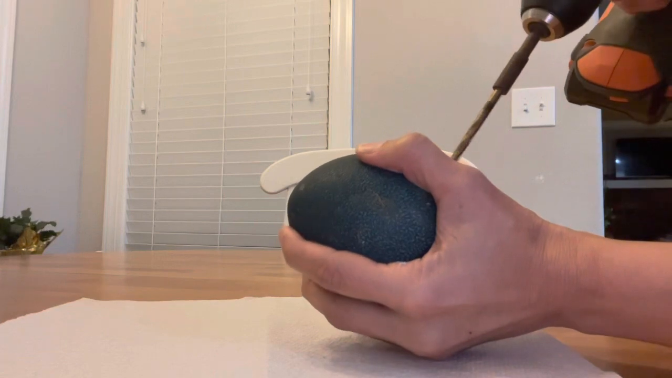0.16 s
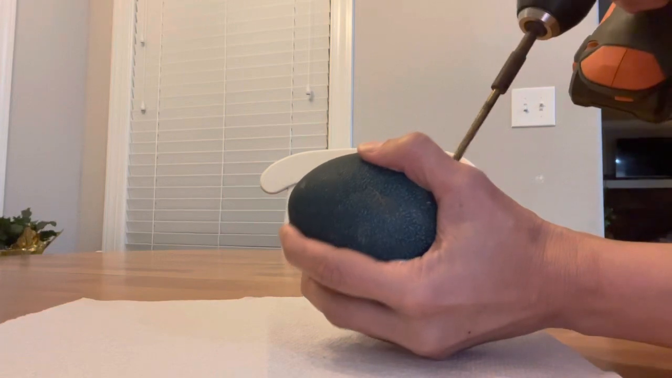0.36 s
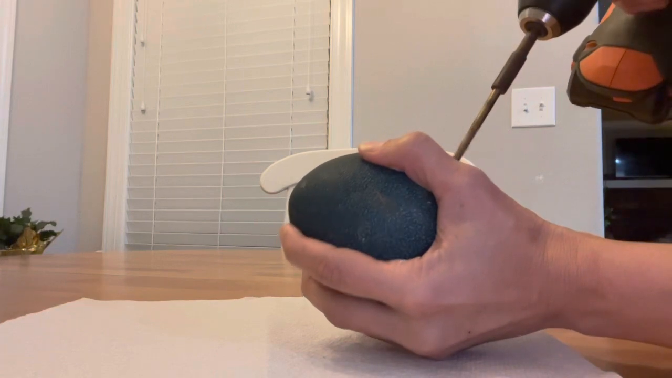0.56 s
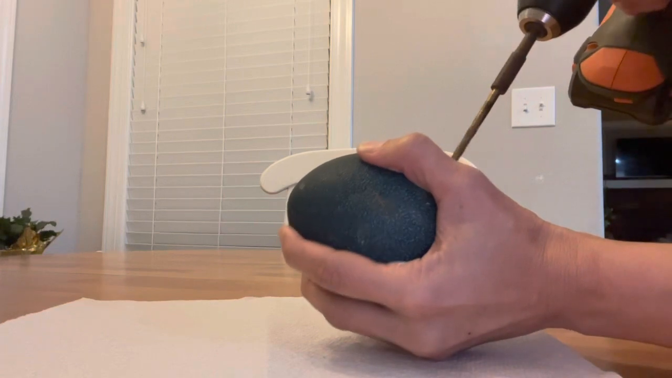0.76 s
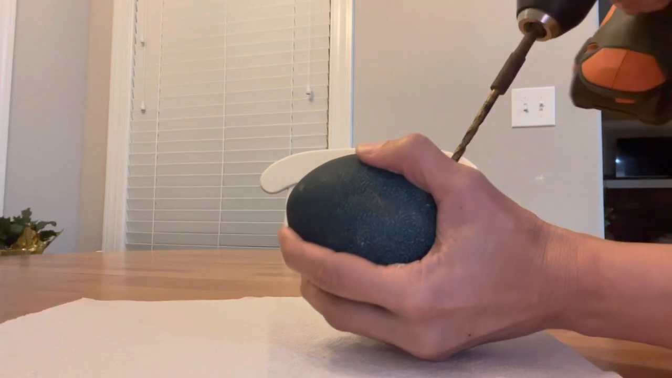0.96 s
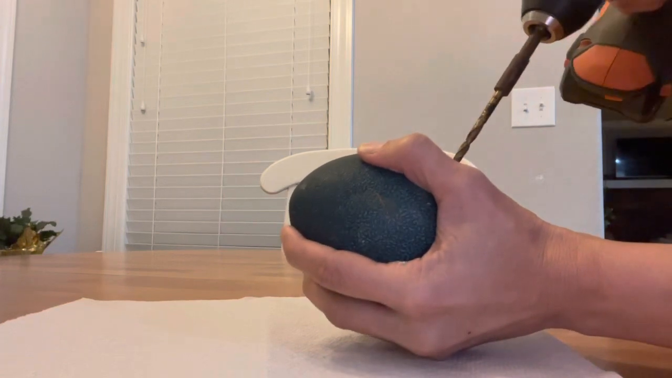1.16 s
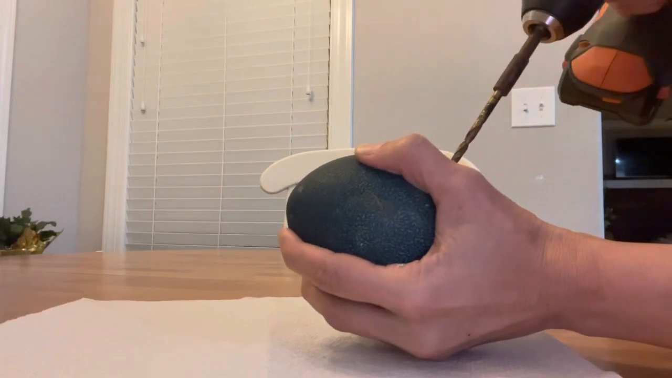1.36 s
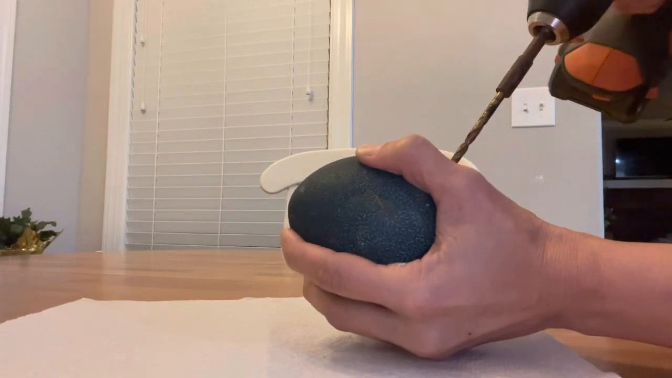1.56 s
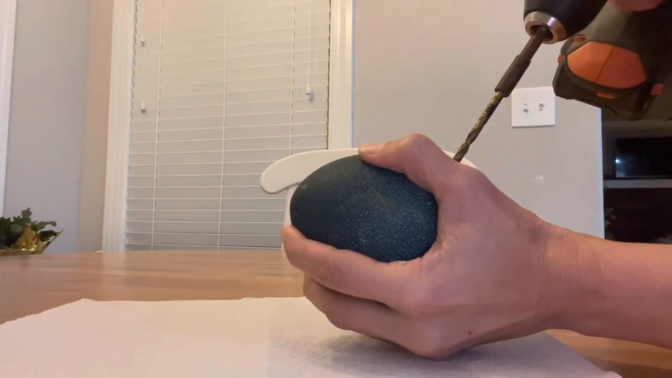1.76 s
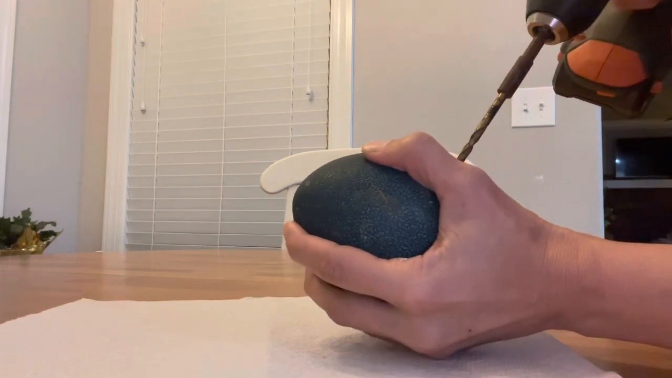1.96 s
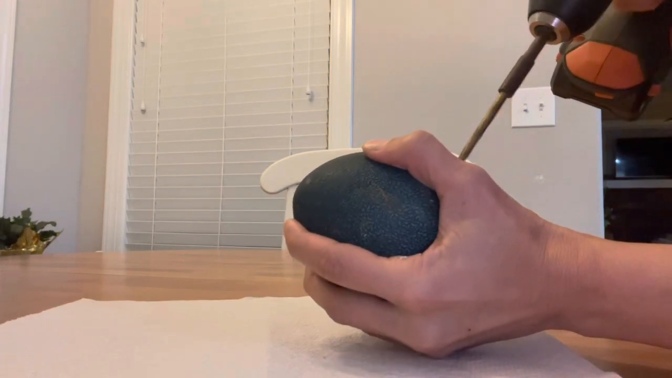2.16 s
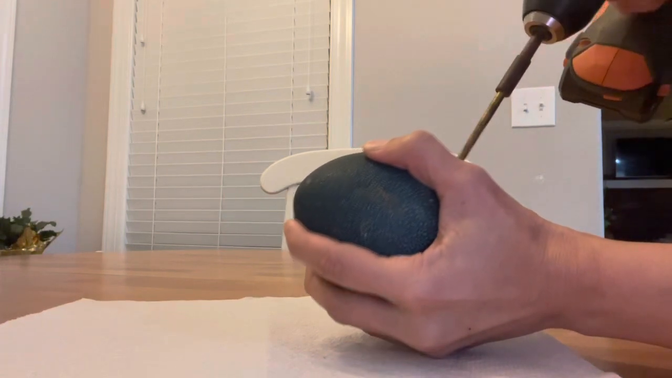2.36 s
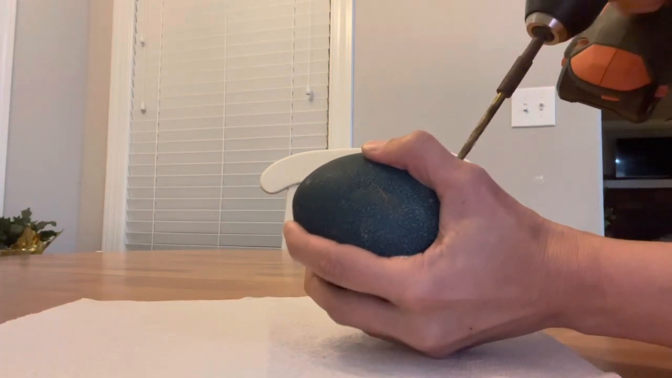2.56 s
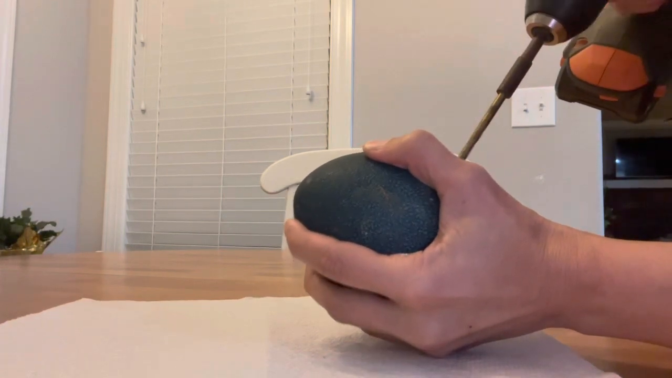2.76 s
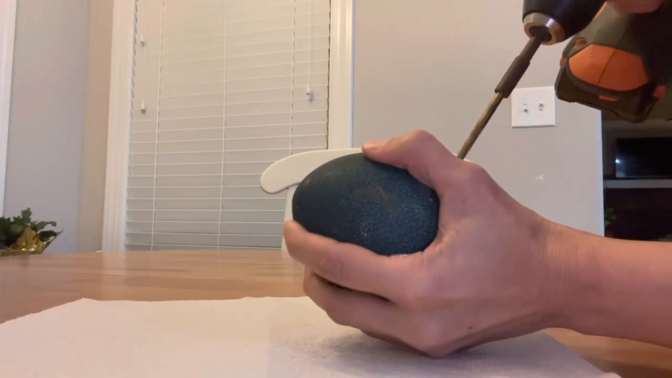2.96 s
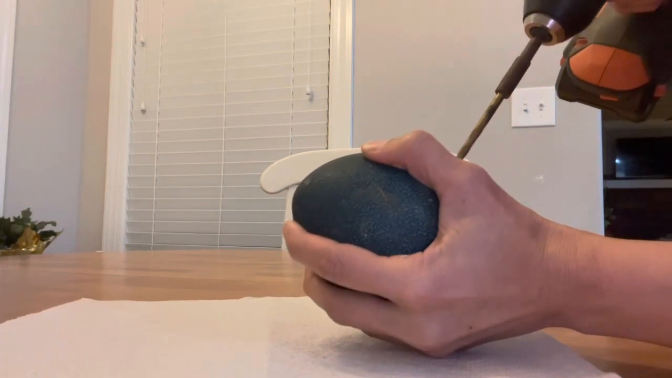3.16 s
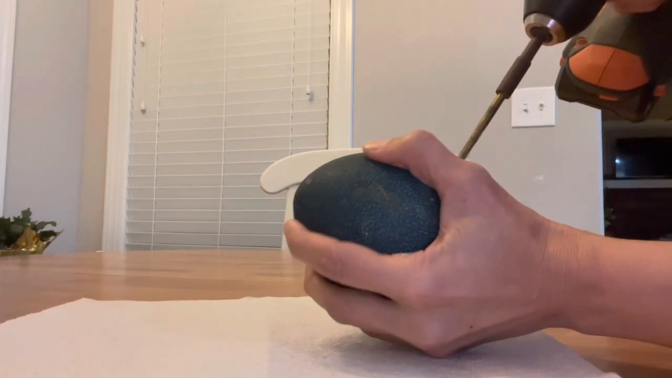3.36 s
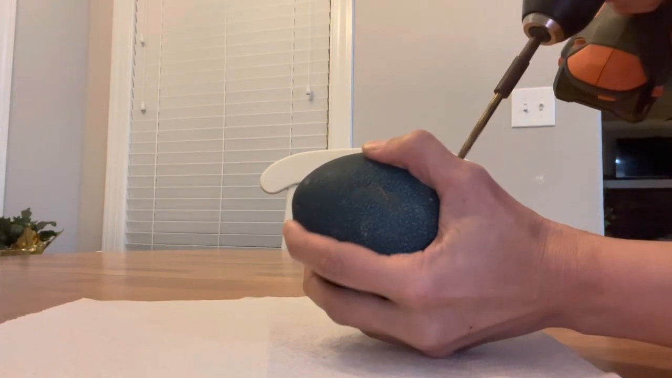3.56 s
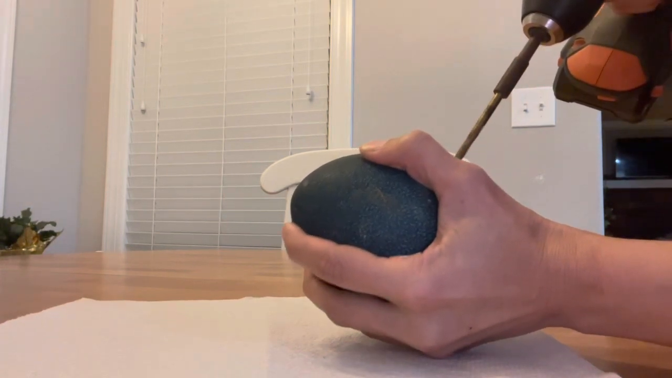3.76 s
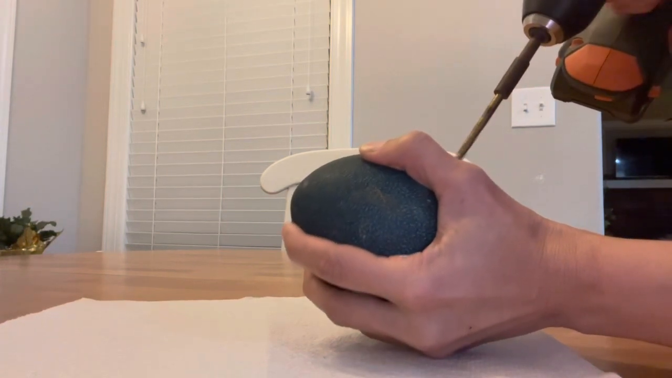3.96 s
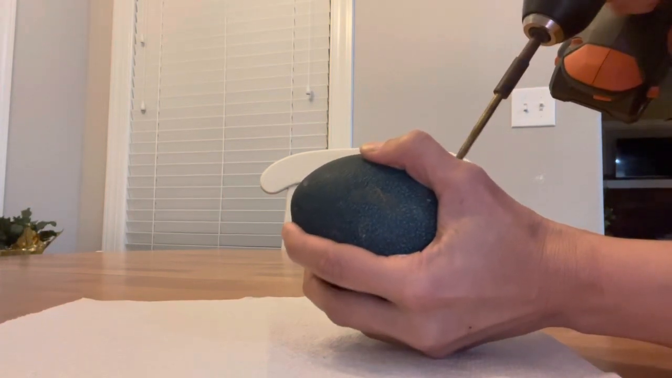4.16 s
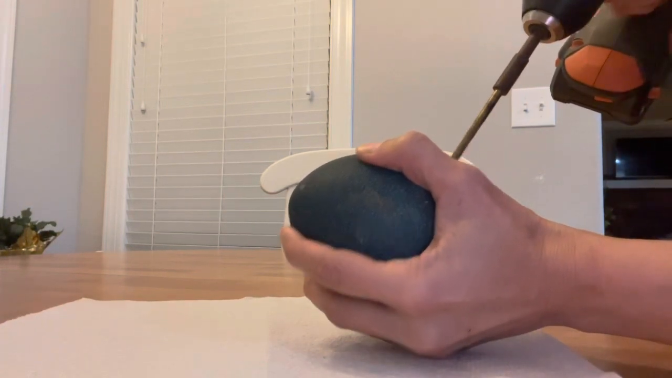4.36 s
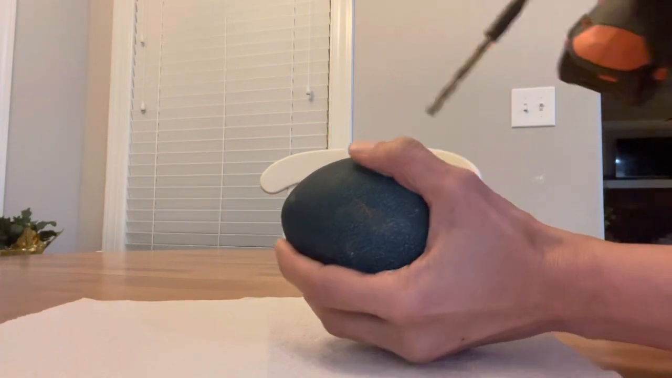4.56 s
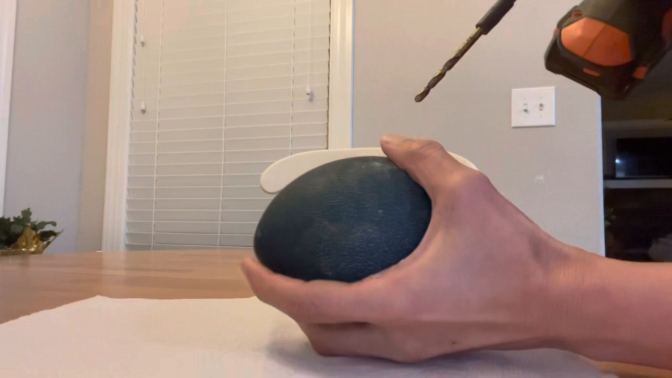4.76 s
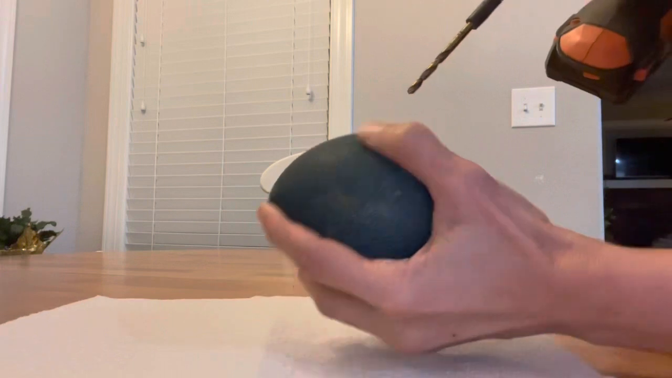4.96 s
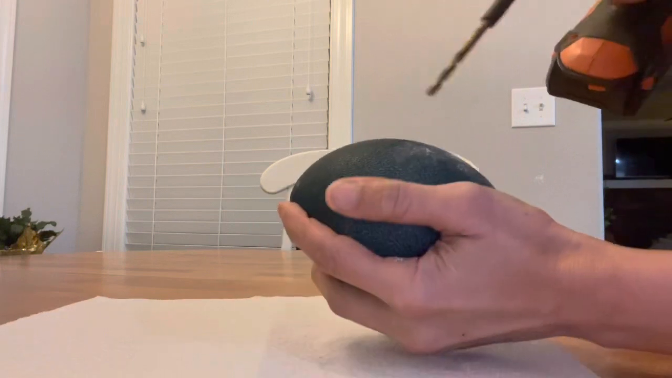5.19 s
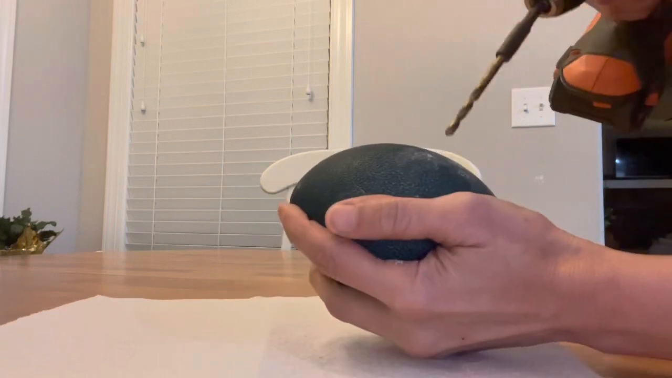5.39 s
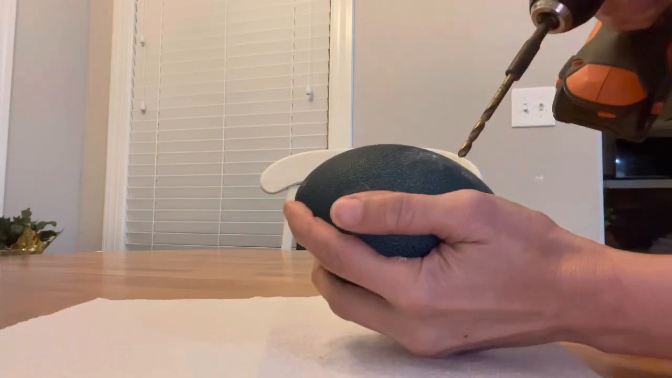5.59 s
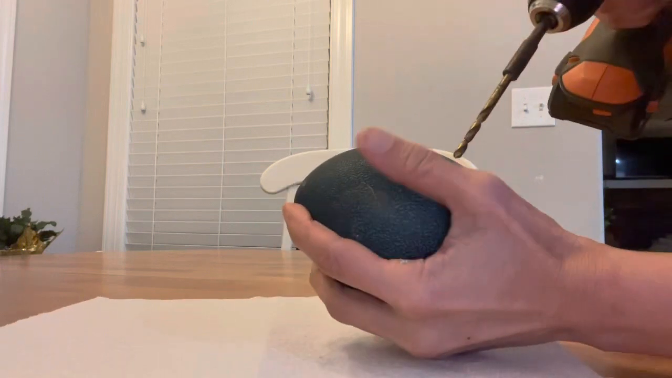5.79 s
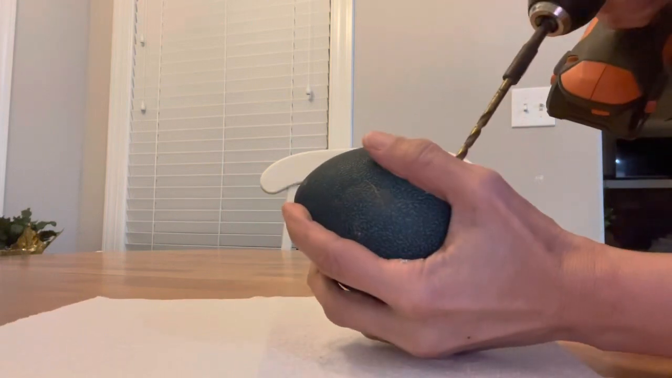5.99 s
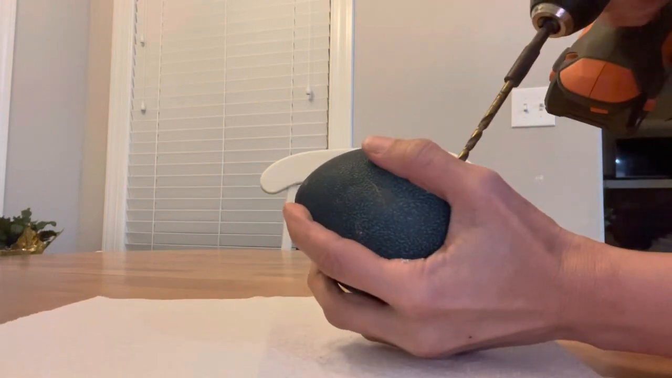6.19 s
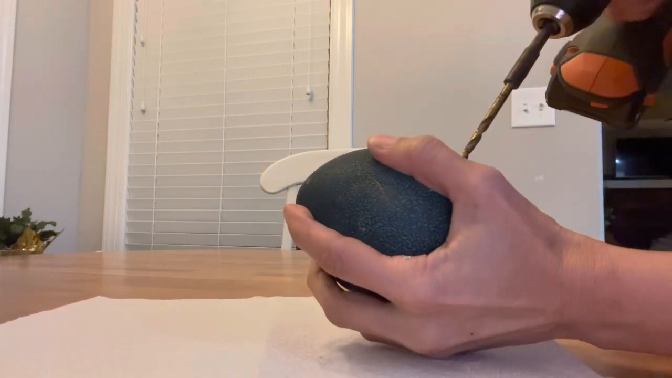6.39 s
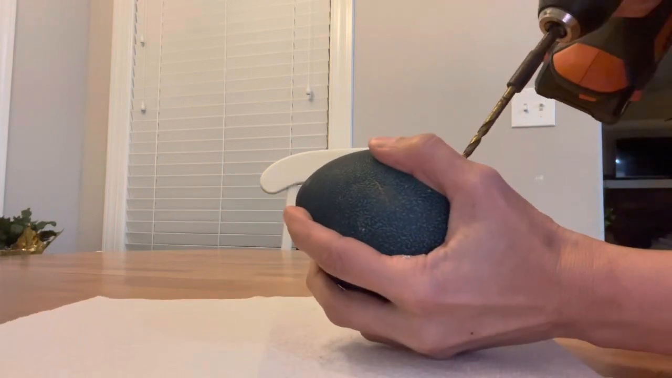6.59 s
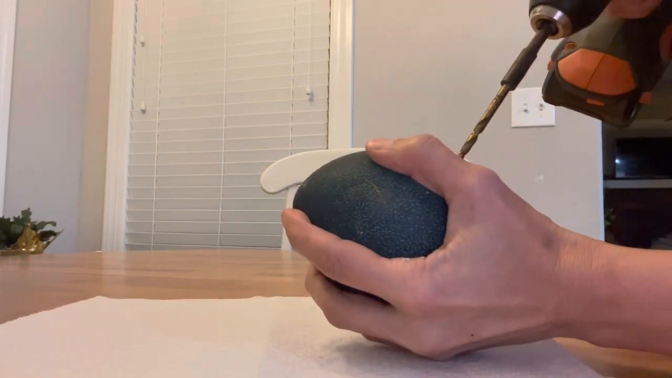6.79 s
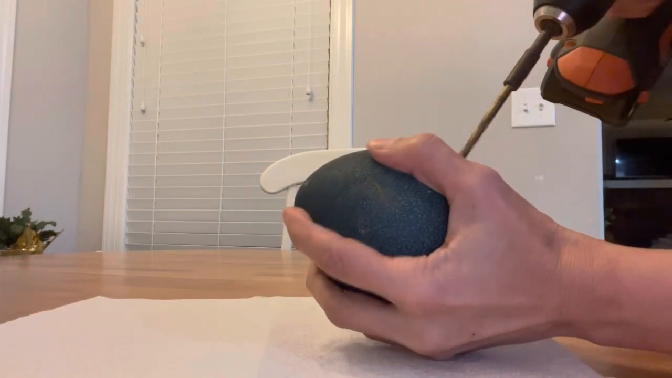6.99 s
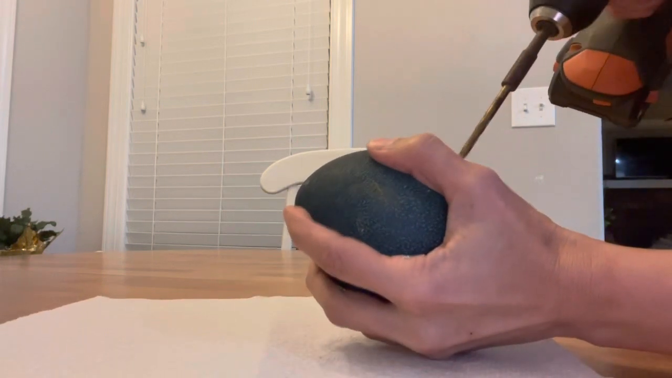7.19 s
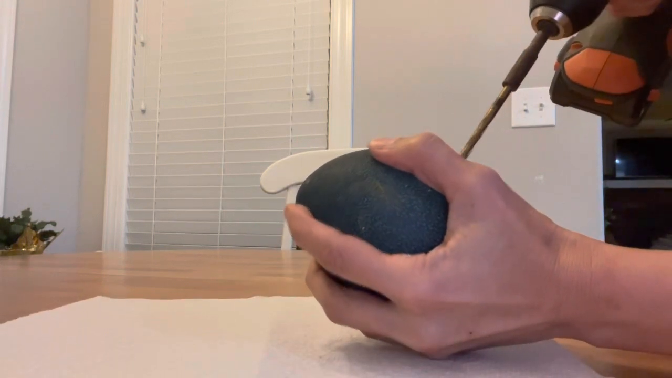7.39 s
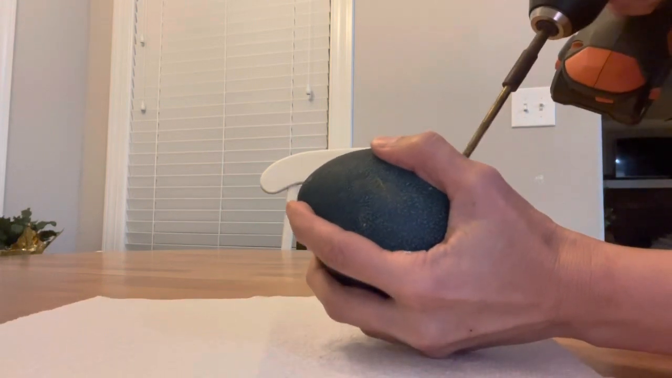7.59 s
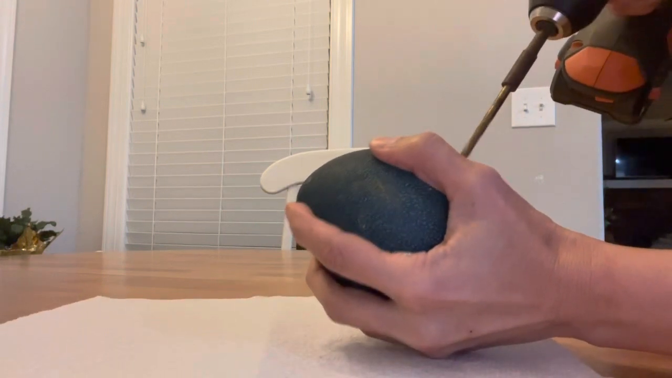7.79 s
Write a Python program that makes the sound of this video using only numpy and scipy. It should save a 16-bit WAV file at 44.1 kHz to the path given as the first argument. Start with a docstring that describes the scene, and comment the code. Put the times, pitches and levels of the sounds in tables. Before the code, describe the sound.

Close stereo microphones in a small room: a cordless drill already running grinds into a thick eggshell, coasts down, then hollow taps precede a longer second burst. It stops, the egg slides and rubs on paper under the hand with small knocks, and a third burst begins with a brighter squeal. Low fluttering thuds swell early on.

```python
"""Drilling an eggshell

Small room, microphone pair close to the table: a cordless drill bores a thick eggshell in three bursts.
Tones locked to the motor shaft whine; coloured impacts and noise make gear rattle, grinding and squeal.
A low throb of falling thuds over a hum swells now and then. In the pauses the bit taps the shell into
decaying rings, and stick-slip noise slides the egg round on its paper. Walls answer, faint air lies under."""
import sys
import numpy as np
from scipy import signal
from scipy.fft import rfft, irfft, next_fast_len
from scipy.io import wavfile
from scipy.ndimage import map_coordinates

SR = 44100
rng = np.random.default_rng(int(sys.argv[2]) if len(sys.argv) > 2 else 0)


def digitize_waveform(pressure):
    """Quantize a signal to 16-bit integers and store it at the path in sys.argv[1].

    Rows of a 2-D input are taken as channels; values are limited to [-1, 1].
    """
    field = np.atleast_2d(pressure).T
    bounded = np.clip(field, -1, 1)
    quanta = np.round(bounded * 32767).astype(np.int16)
    wavfile.write(sys.argv[1], SR, quanta)


N = 345744

# Air of the room: (frequency [Hz], density [dB per Hz])
AIR_SPECTRUM = [(20, -24), (45, -7), (100, 1.5), (200, -8), (330, -.5), (450, -11), (600, -7), (1050, -15),
                (1600, -21), (3700, -27), (5000, -36), (11000, -37), (15500, -50)]
AIR_DB = -74  # the part common to both microphones

# Decay of the room: (frequency [Hz], t60 [s])
ROOM_DECAY = [(150, .5), (1000, .38), (5000, .42), (14000, .2)]
# Rattle and rub sent into the room: (frequency [Hz], level [dB])
ROOM_SEND = [(300, -4), (2000, -3.5), (8000, -6.5), (14000, -11.5)]
WHINE_SEND_DB, CONTACT_SEND_DB = -12.5, -9  # the whine arrives mostly direct

# Sound bending round the camera: (frequency [Hz], lead of the left microphone [rad])
PORT_PHASE = [(0, 0), (1380, -0.5), (3010, -8.6), (6120, -11.3), (7670, -15.8), (8610, -16.0),
              (9730, -18.7), (10900, -18.9), (11900, -21.7), (13700, -22.3), (14600, -25.3), (16500, -25.0)]
# Balance of the microphones: (frequency [Hz], left minus right [dB])
BALANCE_DB = [(90, -2.5), (300, 1.5), (850, -5.5), (1250, 1), (1650, 2), (2150, -2), (2700, -3),
              (3200, 3.5), (4200, 5), (5800, -6), (7100, 3.5), (8200, 0)]
TOP_HZ = 15850  # upper band limit of the camera

# Spells of low throb: (first thud [s], length [s], thud level [dB], deep hum level [dB])
THROBS = [(0.354, 0.625, -24, -34.5), (2.097, 2.25, -45, -46.5), (2.608, 0.11, -37.5, -55.5),
          (3.028, 0.62, -45, -58), (4.329, 0.069, -30.5, -55), (4.463, 0.0119, -33.5, -55.5),
          (7.208, 0.18, -32, -58), (7.345, 0.2, -39, -62)]
BEAT_S = .0465  # from thud to thud
THUD_RISE_DB_PER_S, HUM_RISE_DB_PER_S, THROB_FALL_DB_PER_S = 900, 100, 340

# Hand shifting its grip, sliding the egg: (start [s], length [s], dull rub [dB], skin hiss [dB])
STROKES = [(1.27, 0.74, -58, -95.5), (4.48, 0.36, -67.5, -75), (4.69, 0.07, -76, -74),
           (4.82, 0.17, -65.5, -64), (4.891, 0.39, -54.5, -56.5), (5.108, 0.27, -54, -78),
           (5.275, 0.14, -61, -86.5), (5.307, 0.54, -66, -84.5), (5.58, 0.17, -77, -76)]
STROKE_SKEW = 0.61  # below 1 a stroke swells faster than it fades
# Shell rubbing on paper: (frequency [Hz], density [dB per Hz])
RUB_SPECTRUM = [(30, -12.5), (70, -2), (220, -3), (360, -1), (470, -4), (630, 0), (830, -7.5), (1020, -9.5),
                (1300, -18.5), (2200, -24.5), (3700, -28.5), (5000, -46)]
# Skin brushing the shell: (frequency [Hz], density [dB per Hz])
SKIN_SPECTRUM = [(800, -14), (2300, 1.5), (3600, 0), (5000, -5), (7500, -7.5), (10000, -.5), (12000, -7),
                 (15500, -10)]
# Empty shell sounding when dragged hard: (frequency [Hz], density [dB per Hz])
HOLLOW_SPECTRUM = [(300, -25), (560, -3.5), (680, 0), (820, -6), (1000, -9), (1400, -33)]
HOLLOW_ONSET_DB = -49  # level of rubbing at which the hollow sound equals it

# Taps of the bit, bumps of the egg, clicks of the drill: (time [s], low boom [dB], hollow knock [dB],
# rap [dB], hard clack [dB], bright tick [dB], scuff [dB])
TAPS = [(1.413, -58, -43, -58, -64, -78, -64), (1.429, -48, -42, -39, -43, -51, -66),
        (1.52, -49, -47, -40, -57, -61, -67), (1.526, -45, -36, -43, -48, -54, -64),
        (1.691, -46, -49, -54, -70, -74, -70), (1.819, -58, -55, -60, -59, -67, -60),
        (1.838, -62, -53, -55, -59, -66, -58), (1.873, -50, -52, -55, -49, -51, -44),
        (1.903, -42, -36.5, -41, -28, -52.5, -49), (5.192, -51.5, -42, -55, -80, -82, -72.5),
        (5.295, -50.5, -44.5, -63, -76, -85.5, -76), (5.446, -72, -68.5, -69.5, -58, -65, -76),
        (5.793, -44, -53, -52, -54.5, -53.5, -62), (6.118, -64, -49, -49, -51, -46.5, -66),
        (6.433, -54, -56, -53, -63, -72.5, -64.5), (6.439, -50, -60, -46, -59, -62.5, -58.5),
        (6.615, -77, -65, -63, -73, -81, -76), (6.67, -74, -64, -68, -63, -66.5, -66.5),
        (6.683, -78, -72, -68, -59.5, -69, -74), (6.717, -64, -62, -57, -50, -65, -67),
        (6.744, -59, -50.5, -43, -32, -51, -48.5)]
# What a tap rings with: (frequency [Hz], level [dB], t60 [s])
RING = [(328, 0, .04), (630, 5, .035), (1160, 3, .024), (1300, -2, .022), (1540, -2, .014), (1850, 0, .018),
        (2428, -3, .01), (2900, -3, .007), (3480, 0, .011), (4450, -4, .006), (6200, -7, .012),
        (7600, -5, .008), (10200, 5, .01), (10580, -1, .012)]
# Borders between boom, knock, rap, clack and tick: frequency [Hz]
REGISTER_BORDERS = [450, 900, 2200, 5000]
# Scuff after each tap: (frequency [Hz], density [dB per Hz])
SCUFF_SPECTRUM = [(150, -20), (600, -3.5), (900, -5.5), (1250, -1.5), (1900, 0.5), (2300, -14), (3400, -13),
                  (4500, -28.5), (10000, -38)]
SCUFF_T60_S = 0.18
# Bending waves in the shell: low modes arrive later (delay at 1 kHz) and swell over a few cycles
BLOOM_S, RISE_CYCLES = 0.0027, 0.4

# Bursts of the drill: (trigger pulled [s], let go [s], spin-up [s], length of the opening push [s],
# strength of that push [dB], squeal of the bit [dB])
BURSTS = [(-.16, 0.885, 0.16, 0.94, 1.77, -53), (1.816, 4.326, .16, 0.68, 3, -50),
          (6.665, 8, .162, 0.64, 1.5, -32.5)]
TOP_SPEED = 307.9  # motor shaft, nominal turns per second
SPIN_UP_SHAPE, COAST_S = 1.9, .24  # speed gathers on an S-curve and coasts down evenly
GEAR_RATIO = 50  # motor turns to one turn of the chuck
GEAR_DB, GRIND_DB = -24, -32.5  # at full speed under a steady hand
IDLE_DB = -21.5  # change of the gearbox without load
SPEED_POWER, GRIND_POWER = 1.5, 1.7  # gearbox and grinding grow as these powers of speed
GRIND_PER_PUSH = 1.2  # dB of grinding per dB of push
SURGE_DB = -1  # change of level midway through spin-up
CREEP_DB = -67.5  # the gears rustle while the trigger is held
BITE_S, GRAB_S = 0.065, 0.021  # the load comes on a moment after the trigger, then builds up
UNLOAD_S, RELAX_S = 0.036, 0.089  # the load falls away on release; the opening push eases off
CHATTER_DB = -38.5  # the bit skips while its speed changes
LURCH_DB = 4  # random swing of a slow gearbox, near standstill
TOOTH_DB, RUNOUT_DB = .55, .75  # sway from uneven teeth and from the off-centre bit

# Catches of the bit in the shell: (time [s], change of grinding [dB])
CATCHES = [(0.322, 5), (0.915, 15), (2.04, 4.5), (2.166, 3.5), (2.26, 2.5), (2.38, 4.5), (3.648, 3),
           (3.885, 3), (3.978, 6.5), (4.07, 3.5), (4.255, 1.5), (4.33, 2.5), (6.836, -3), (7.36, 4),
           (7.42, 6)]
CATCH_S = 0.009
# Motor and gear-mesh tones: (multiple of shaft speed, level [dB])
WHINE_TONES = [(1, -9.5), (2, -19), (2.45, -23), (3, -22), (4, -22), (5, -18.5), (9.8, -22), (10, -13.5),
               (12, -13), (15, -10.5), (19, -18), (23, -17.5), (25, -13), (26, -22), (29, -23), (30, -15),
               (35, -17.5)]
# Rattle of the gearbox: (frequency [Hz], density [dB per Hz])
GEARBOX_SPECTRUM = [(150, -19), (400, -10), (1450, -8.5), (1750, -4.5), (2000, -11), (2330, -5),
                    (2750, -6.5), (3060, 0.5), (3280, -1), (4100, -2.5), (4600, 0), (5150, -5), (6050, 0),
                    (6550, -2), (6850, -4.5), (7300, 1), (8600, -5.5), (9400, -3.5), (10000, -4),
                    (10700, -9), (11600, -6.5), (13500, -14.5), (15600, -6.5)]
# Grinding of the bit: (frequency [Hz], density [dB per Hz])
GRIND_SPECTRUM = [(30, -37), (60, -12.5), (220, -17.5), (380, -9.5), (600, -2), (860, -10.5), (1000, -9),
                  (1250, -3.5), (1480, -14), (2200, -9.5), (6000, -51.5)]
# Bit ringing as it rubs in the hole: (frequency [Hz], density [dB per Hz])
SQUEAL_SPECTRUM = [(5000, -35.5), (5400, -6), (5700, -22.5), (5980, -9), (6090, 1.5), (6200, -5.5),
                   (6450, -43)]
# Likeness of the gear noise at both microphones: (frequency [Hz], shared part [0 to 1])
GEAR_ALIKE = [(300, 0.93), (2000, 0.78), (4000, 0.56), (8000, 0.54), (12000, .93)]


def amp(db):
    """Gain of a level in dB."""
    return 10 ** (np.asarray(db) / 20)


def unit(x):
    """x at rms 1."""
    return x / np.sqrt(np.mean(x ** 2) + 1e-20)


def along(points, hz):
    """Value at hz between (frequency [Hz], value) points, on a log axis."""
    f, v = np.transpose(points)
    return np.interp(np.log(hz + 1), np.log(f + 1), v)


def clock():
    """Time of every sample in seconds."""
    return np.arange(N) / SR


def wobble(rate):
    """A smooth random curve, rate knots a second."""
    knots = rng.standard_normal(int(N * rate / SR) + 4)
    return map_coordinates(knots, [np.arange(N) * rate / SR])


def filtered(x, response):
    """x through a complex response of frequency."""
    m = next_fast_len(N + SR // 2)
    return irfft(rfft(x, m) * response(np.fft.rfftfreq(m, 1 / SR)), m)[..., :N]


def coloured(x, spectrum):
    """x through a (frequency [Hz], level [dB]) spectrum, at rms 1."""
    return unit(filtered(x, lambda hz: amp(along(spectrum, hz))))


def grit(rate, share):
    """Tiny impacts at random moments, rate a second, over a smooth rush; share is their part of the power."""
    share = np.clip(share, 0, 1)
    impacts = rng.uniform(-0.78, 1, N) * (rng.random(N) < rate / SR)
    return np.sqrt(share) * unit(impacts) + np.sqrt(1 - share) * rng.standard_normal(N)


def ambience():
    """The faint steady air of the room, partly alike at both microphones."""
    air = coloured(rng.standard_normal((3, N)), AIR_SPECTRUM)
    return amp(AIR_DB) * (air[:2] * 1.6 + air[2])


def room(x):
    """Diffuse answer of the walls: decaying noise, different at each microphone."""
    hz, t, z = signal.stft(rng.standard_normal((2, SR // 2)), SR, nperseg=256)
    decay = amp(-60 * t / along(ROOM_DECAY, hz)[:, None])
    tail = signal.istft(z * decay, SR, nperseg=256)[1]
    tail = np.pad(tail / np.linalg.norm(tail[0]), ((0, 0), (SR // 300, 0)))
    return signal.fftconvolve(x, tail, axes=1)[:, :N]


def ports(x):
    """Direct sound bends round the camera and reaches the right microphone first."""
    sides = np.array([[.5], [-.5]])
    return filtered(x, lambda hz: np.exp(1j * np.interp(hz, *np.transpose(PORT_PHASE)) * sides))


def lagged(x, lag):
    """A sound that reaches the left microphone lag seconds after the right."""
    sides = np.array([[-1], [1]])
    return filtered(x, lambda hz: np.exp(1j * np.pi * hz * lag * sides))


def spread(make, alike):
    """A wide source: part of its noise reaches both microphones, part is each one's own."""
    def share(hz):
        return np.clip(along(alike, hz), 0, 1)

    common = ports(filtered(make(), lambda hz: np.sqrt(share(hz))))
    own = filtered(np.array([make(), make()]), lambda hz: np.sqrt(1 - share(hz)))
    return common + own


def held(start, length, rise, fall):
    """Rise, hold and fall, with slopes in dB a second."""
    t = clock() - start
    return amp(rise * np.minimum(t, 0) - fall * np.maximum(t - length, 0))


def throb(start_hz=190, end_hz=64, glide=0.0091, width=0.0057, peak=0.012):
    """Soft low thuds in even succession, each falling in pitch, over a deep hum at twice their rate."""
    out = np.zeros(N)
    for start, length, thud_db, hum_db in THROBS:
        thud = amp(thud_db) * held(start, length, THUD_RISE_DB_PER_S, THROB_FALL_DB_PER_S)
        hum = amp(hum_db) * held(start, length, HUM_RISE_DB_PER_S, THROB_FALL_DB_PER_S)
        t = (clock() - start + .0006 * wobble(12)) % BEAT_S  # the beat drifts a little
        cycles = end_hz * t + (start_hz - end_hz) * glide * (1 - np.exp(-t / glide))
        bump = np.exp(-.5 * (np.log((t + 1e-6) / peak) * peak / width) ** 2) * (1 - t / BEAT_S)
        out += thud * unit(-bump * np.sin(2 * np.pi * cycles))
        out += hum * unit(np.sin(4 * np.pi * t / BEAT_S))
    return out * amp(1.1 * wobble(11))


def swell(start, length):
    """The smooth rise and fall of one stroke of the hand."""
    progress = np.clip((clock() - start) / length, 0, 1)
    return np.sin(np.pi * progress ** STROKE_SKEW) ** 2


def handling():
    """The shell rubs on the paper while skin brushes over it; both stick and slip."""
    rub = sum(amp(rub_db) * swell(s, length) for s, length, rub_db, _ in STROKES)
    skin = sum(amp(skin_db) * swell(s, length) for s, length, _, skin_db in STROKES)
    slip = amp(2.9 * wobble(33))
    dull = rub * slip * coloured(grit(rate=270, share=0.56), RUB_SPECTRUM)
    drag = rub ** 2 / amp(HOLLOW_ONSET_DB)  # grows faster than the rub itself
    hollow = drag * slip * coloured(grit(rate=350, share=0.4), HOLLOW_SPECTRUM)
    hiss = skin * amp(1.8 * wobble(39)) * coloured(grit(rate=4800, share=0.43), SKIN_SPECTRUM)
    return dull + hollow + hiss


def taps():
    """Each contact gives a bright tick of steel, then ever lower rings of the hollow shell, and a short scuff."""
    out, scuff = np.zeros(N + SR), np.zeros(N + SR)
    t = np.arange(SR // 4) / SR
    hz, level, t60 = np.transpose(RING)[:, :, None]
    delay = BLOOM_S * np.sqrt(1000 / hz)
    age = np.maximum(t - delay + delay.min(), 0)
    register = np.searchsorted(REGISTER_BORDERS, hz)
    for s, boom_db, knock_db, rap_db, clack_db, tick_db, scuff_db in TAPS:
        chance = rng.standard_normal((len(RING), 2))  # each blow varies level and pitch of each mode
        force = amp([boom_db, knock_db, rap_db, clack_db, tick_db])[register]
        blow = force * (1 - np.exp(-age * hz / RISE_CYCLES))
        decay = amp(level + 2.5 * chance[:, :1] - 60 * age / t60)
        modes = blow * decay * np.sin(2 * np.pi * hz * (1 + 0.03 * chance[:, 1:]) * age)
        crack = amp(tick_db - 60 * t / 0.006) * rng.standard_normal(len(t))
        first = round(s * SR)
        out[first:][:len(t)] += modes.sum(0) + crack
        scuff[first:][:len(t)] += amp(scuff_db - 60 * t / SCUFF_T60_S)
    return out[:N] + scuff[:N] * coloured(grit(rate=5700, share=0.42), SCUFF_SPECTRUM)


def drive():
    """Shaft speed and the gains of gearbox, grinding, squeal and skipping, from trigger, load and push."""
    t = clock()
    speed, gear, grind, squeal, skip = np.zeros((5, N))
    catch_db = sum(db * np.exp(-.5 * ((t - s) / CATCH_S) ** 2) for s, db in CATCHES)
    for on, off, spin_up_s, push_s, push_db, squeal_db in BURSTS:
        pulled, released = np.maximum(t - on, 0), np.maximum(t - off, 0)
        spin_up = 1 - np.exp(-(pulled / spin_up_s) ** SPIN_UP_SHAPE)
        pace = spin_up * np.maximum(1 - released / COAST_S, 0)
        load = 1 - np.exp(-np.maximum(pulled - BITE_S, 0) / GRAB_S)
        load *= np.exp(-released / UNLOAD_S)
        midway = np.sin(np.pi * pace ** 2)  # greatest between standstill and full speed
        push = push_db * (1 - np.tanh((pulled - push_s) / (2 * RELAX_S))) / 2
        push += SURGE_DB * midway * (t < off)
        speed += TOP_SPEED * pace
        gear += pace ** SPEED_POWER * amp(GEAR_DB + push + IDLE_DB * (1 - load))
        gear += amp(CREEP_DB) * (t > on) * (t < off)
        grind += pace ** GRIND_POWER * load * amp(GRIND_DB + GRIND_PER_PUSH * push + catch_db)
        squeal += pace ** 2 * load * amp(squeal_db + push)
        skip += midway * load * amp(CHATTER_DB)
    return speed, gear, grind, squeal, skip


def chatter(rate=420, soft_hz=3900):
    """Before it runs smoothly the bit skips on the shell, and every skip rings it."""
    t = np.arange(SR // 20) / SR
    ring = np.zeros(len(t))
    for hz, db, t60 in RING:
        softness = 1 + (hz / soft_hz) ** 4  # weakens the high modes
        ring += amp(db - 60 * t / t60) / softness * np.sin(2 * np.pi * hz * t)
    return unit(signal.fftconvolve(grit(rate=rate, share=.85), ring)[:N])


def grinding(speed, surge_db=1.76, split_hz=850):
    """Cutting edges catch and slip on chalky shell; lower and upper resonances surge each on their own."""
    bite = amp(1.4 * wobble(110))
    lower, upper = amp(surge_db * wobble(28)), amp(surge_db * wobble(28))

    def scrape():
        rasp = coloured(grit(rate=2.5 * speed, share=.45) * bite, GRIND_SPECTRUM)
        low = filtered(rasp, lambda hz: 1 / (1 + (hz / split_hz) ** 6))
        return unit(lower * low + upper * (rasp - low))
    return spread(scrape, [(1000, 0.83)])


def whining(turns):
    """Tones at multiples of the shaft speed flutter as the gears shift in their play, the high ones most."""
    whine = np.zeros(N)
    for order, db in WHINE_TONES:
        flutter = amp((1 + .04 * order) * wobble(40))
        phase = 2 * np.pi * order * turns + 0.055 * order ** .5 * wobble(45)
        whine += amp(db) * flutter * np.sin(phase)
    return whine


def drill():
    """Rattle with grinding and squeal, and the whine apart; speed and load of the motor drive them all."""
    speed, gear, grind, squeal, skip = drive()
    turns = np.cumsum(speed * (1 + .0009 * wobble(20))) / SR  # the load makes the speed waver
    chuck = turns / GEAR_RATIO
    # uneven teeth load the gears in a pattern that comes back with each turn of the chuck
    teeth = rng.standard_normal(size=12)
    load = unit(map_coordinates(teeth - teeth.mean(), [chuck % 1 * len(teeth)], mode="grid-wrap"))
    sway = amp(TOOTH_DB * load + RUNOUT_DB * np.sin(2 * np.pi * chuck))
    lurch = amp(LURCH_DB * (1 - speed / TOP_SPEED) * wobble(60))
    mesh = sway * amp(1.3 * np.cos(2 * np.pi * turns))

    def gear_noise():
        return coloured(grit(rate=8 * speed, share=0.43) * mesh, GEARBOX_SPECTRUM)

    def squeal_noise():
        return coloured(rng.standard_normal(N), SQUEAL_SPECTRUM)

    rattle = gear * lurch * spread(gear_noise, GEAR_ALIKE)
    scrape = grind * grinding(speed) + skip * ports(chatter())
    ringing = squeal * sway * spread(squeal_noise, GEAR_ALIKE)
    singing = (speed / TOP_SPEED) ** 6  # the tones come out only near full speed
    return rattle + scrape + ringing, gear * singing * whining(turns)


def scene():
    """Drill, egg and room at the two microphones."""
    rattle, whine = drill()
    contacts = ports(taps())
    noisy = rattle + spread(handling, [(1000, 0.4)])
    direct = noisy + contacts + lagged(whine, lag=.00008) + lagged(throb(), lag=.0017)
    sent = filtered(noisy, lambda hz: amp(along(ROOM_SEND, hz)))
    sent = sent + amp(WHINE_SEND_DB) * whine + amp(CONTACT_SEND_DB) * contacts
    both = direct + room(sent)
    sides = np.array([[.5], [-.5]])
    return filtered(both, lambda hz: amp(along(BALANCE_DB, hz) * sides)) + ambience()


def record(dry):
    """The camera cuts the deepest bass and falls away steeply at its band limit."""
    def band(hz):
        bass_cut = hz ** 8 / (hz ** 8 + 33 ** 8)
        return bass_cut / (1 + (hz / TOP_HZ) ** 160)
    return filtered(dry, band)


dry = scene()
out = record(dry)
digitize_waveform(out)
```